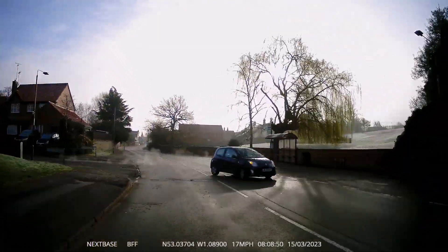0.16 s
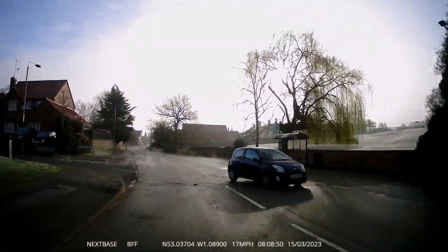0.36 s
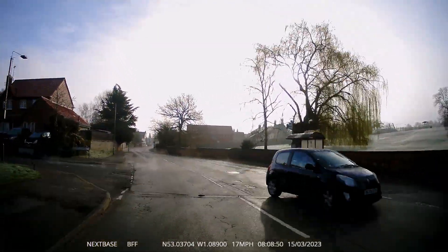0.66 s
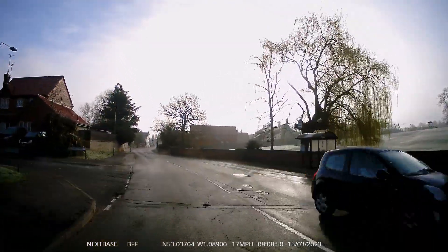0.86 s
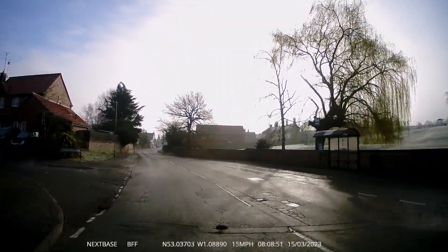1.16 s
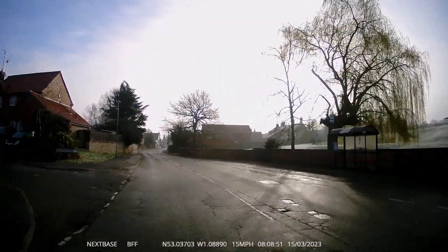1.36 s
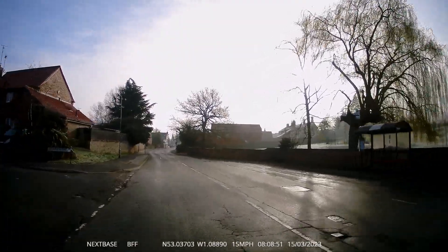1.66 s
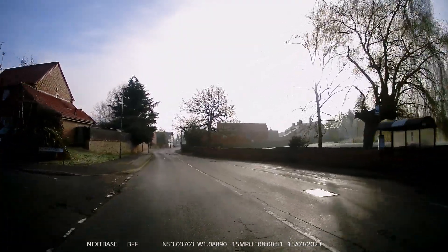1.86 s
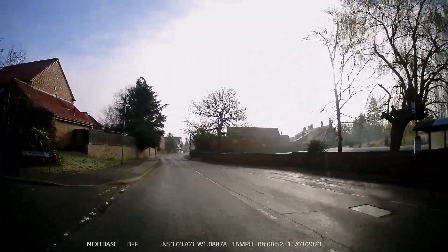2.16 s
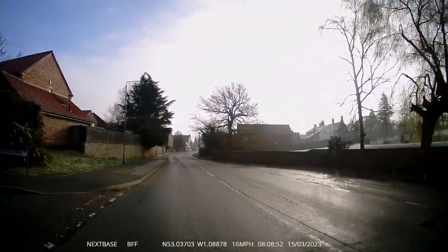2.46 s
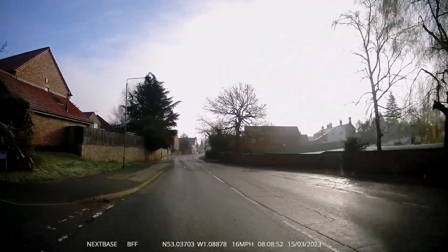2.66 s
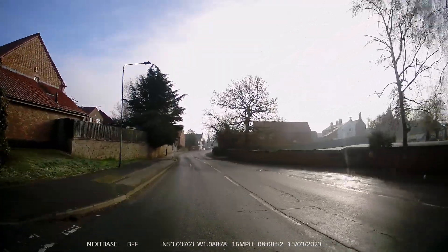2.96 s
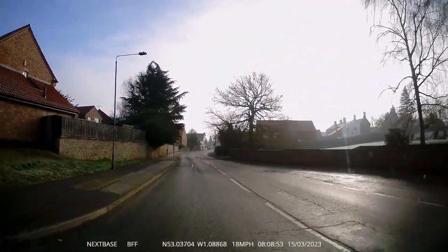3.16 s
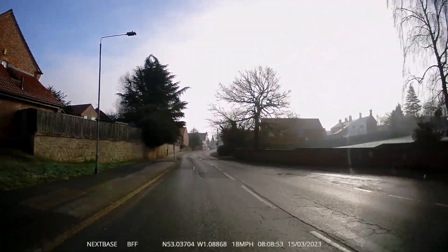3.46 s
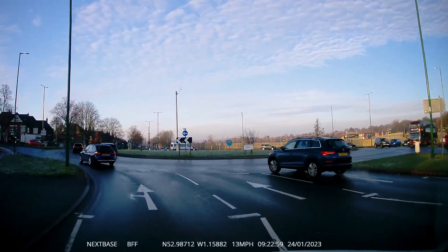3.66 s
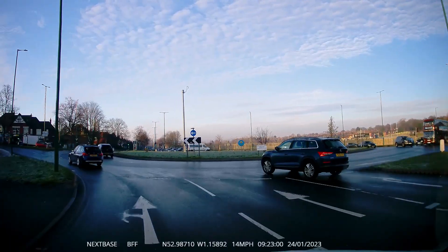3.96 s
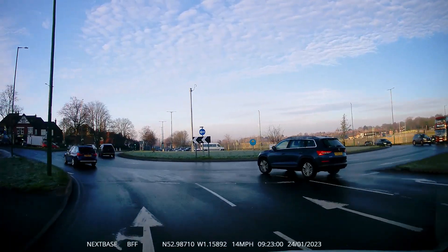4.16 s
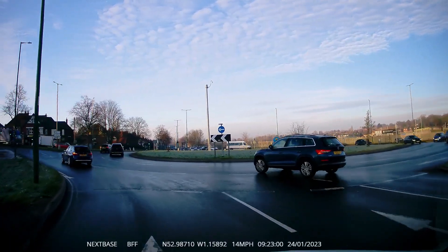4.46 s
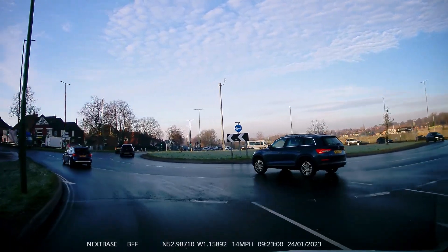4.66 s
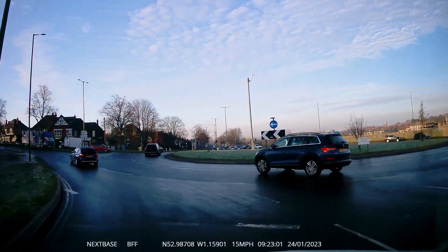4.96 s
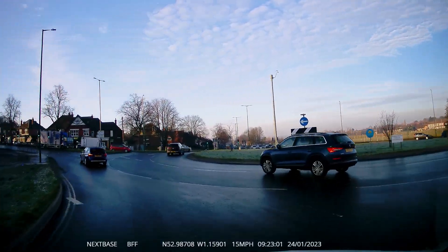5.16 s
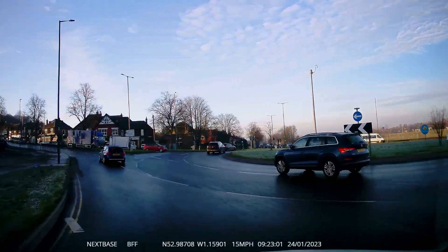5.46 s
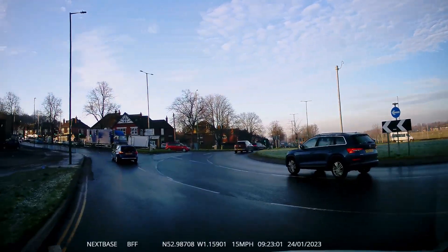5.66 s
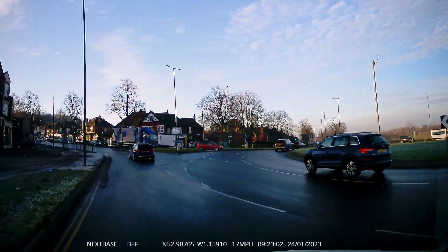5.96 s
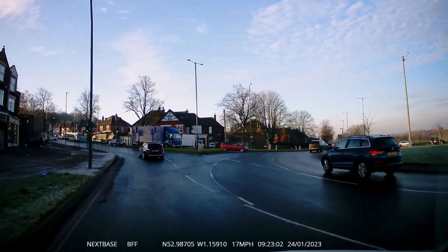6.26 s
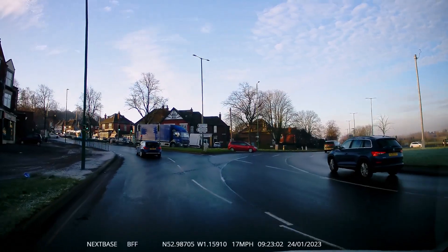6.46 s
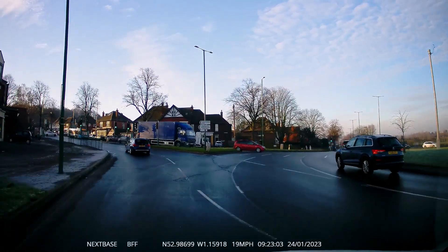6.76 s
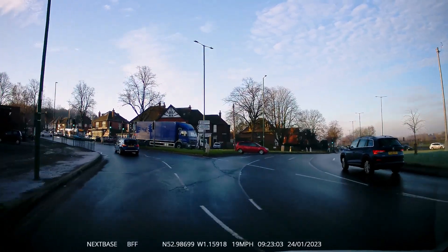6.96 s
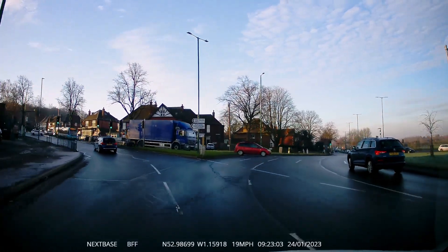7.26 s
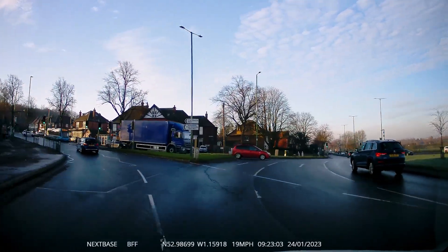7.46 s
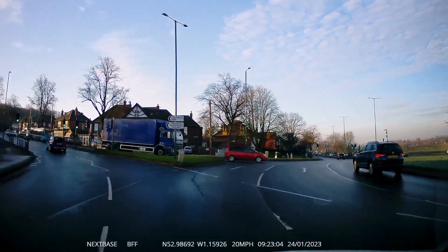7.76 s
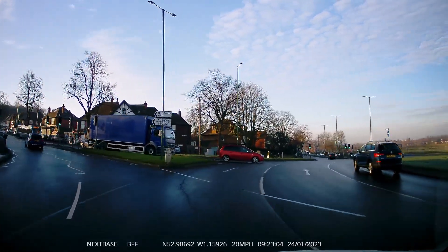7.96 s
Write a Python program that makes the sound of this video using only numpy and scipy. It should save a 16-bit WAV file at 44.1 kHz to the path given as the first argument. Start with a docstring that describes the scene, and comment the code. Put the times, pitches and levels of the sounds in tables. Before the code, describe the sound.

A microphone in the enclosed cabin picks up boomy, bass-heavy road noise. First a slow dry street: quiet tyres, low engine and a run of rattling bumps. After a split-second gap, a wet roundabout brings fuller hiss and rumble while the engine pitch rises. Loose things chatter into one sharp bang, a low hum climbs, and the engine falls to a lower note with more bumps.

```python
"""Inside a car at town speed

Shaped noise makes road rumble, roar and hiss; randomly driven resonances shake the body and boom in the cabin.
Bumps excite modes of trim and panels, loose things chatter, and a low hum climbs late on.
The engine, a firing tone with overtones lifted by cabin resonances, rises and falls through the gears.
A dry street gives way to a wet roundabout: the sound drops out for an instant and the hiss changes."""
import sys
import numpy as np
from scipy import signal
from scipy.fft import rfft, irfft
from scipy.io import wavfile
from scipy.ndimage import uniform_filter1d

SR = 44100
rng = np.random.default_rng(int(sys.argv[2]) if len(sys.argv) > 2 else 0)


def file_out(sig):
    """Save sig as 16-bit WAV at sys.argv[1]."""
    # one column per channel
    cols = np.atleast_2d(sig).T
    # limit, then scale
    lim = np.clip(cols, -1, 1)
    pcm = np.round(lim * 32767).astype(np.int16)
    wavfile.write(sys.argv[1], SR, pcm)


N = 358086  # samples
WET_START_S = 3.579  # the dry street ends, and the sound is silent for an instant


def gain_of(db):
    """Logarithmic level: decibels become an amplitude ratio."""
    return 10 ** (np.asarray(db) / 20)


def evened(x):
    """Root-mean-square level: scales a signal to unit rms."""
    return x / np.sqrt(np.mean(abs(x) ** 2) + 1e-20)


def read(points, hz):
    """Spectral envelope: interpolates levels on a log-frequency axis."""
    f, value = np.transpose(points)
    return np.interp(np.log(hz + 1), np.log(f + 1), value)


def columns(rows):
    """Control curves: interpolates the columns of a table linearly in time."""
    s, *values = np.transpose(rows)
    return [np.interp(np.arange(N) / SR, s, v, left=v[0], right=v[-1]) for v in values]


def peak(s, db, rise, fall):
    """Exponential growth and decay: a level in dB peaks at s, with slopes in dB per second."""
    t = np.arange(N) / SR - s
    return db + np.minimum(rise * t, -fall * t)


def add(mix, s, sound):
    """Superposition: adds a sound to the mix at time s."""
    part = mix[round(s * SR):][:len(sound)]
    part += sound[:len(part)]


def modes(table, hz, extra_db=0, damping=1):
    """Modal superposition: sums the complex responses of resonances; damping widens them."""
    f, width, db = (np.array(c)[:, None] for c in zip(*table))
    width = width * damping
    gains = gain_of(db + np.reshape(extra_db, (-1, 1)))
    return (gains * width / (width + 2j * (hz - f))).sum(0)


def drift(hz):
    """Slow random modulation: sums sines of random phase up to hz, at unit rms."""
    t = np.arange(N // 256 + 2) * 256 / SR
    sines = (np.sin(2 * np.pi * (f * t + rng.random())) / np.sqrt(f)
             for f in np.geomspace(hz / 20, hz, 20))
    return np.interp(np.arange(N) / SR, t, evened(sum(sines)))


def noise(spectrum, patchy_db, flicker_db, size):
    """Shaped noise: random short-time spectra with drifting patches and a flicker shared by all bands."""
    frames, hz = 4 * N // size + 5, np.fft.rfftfreq(size, 1 / SR)
    a, b, patches = rng.standard_normal((frames, len(hz), 3)).T
    patches = uniform_filter1d(patches, 8, 0)  # smooth along frequency
    patches = evened(uniform_filter1d(patches, 8, 1))  # smooth along time
    flicker = evened(uniform_filter1d(rng.standard_normal(frames), 3))
    level_db = read(spectrum, hz)[:, None] + patchy_db * patches + flicker_db * flicker
    z = (a + 1j * b) * gain_of(level_db)
    return evened(signal.istft(z, nperseg=size, noverlap=size * 3 // 4)[1][:N])


def ringing(hz, width, steadiness):
    """Randomly driven resonance: a narrow band of noise, with its level swings partly evened out."""
    r = np.exp(-np.pi * width * 1.5 / SR)  # two equal poles in cascade
    drive = [1, 1j] @ rng.standard_normal((2, N + SR // 4))
    z = evened(signal.lfilter([1], [1, -2 * r, r * r], drive)[-N:])
    z = z / (abs(z) + .4) ** np.clip(steadiness, 0, 1)
    carrier = np.exp(2j * np.pi * np.cumsum(hz * np.ones(N)) / SR)
    return evened((z * carrier).real)


# Road roughness. Each row: time in seconds, tyre rumble level in dB.
ROUGHNESS = [(0.0, -36), (0.79, -36.5), (2.26, -30.5), (2.92, -33.5), (3.56, -31.5), (5.13, -27),
             (5.52, -24.5), (5.7, -26.5), (6.83, -27), (7.76, -28.5), (8.12, -28)]
ROAD_REFERENCE_DB = -32  # rumble level on an average road


def follow_road(db, slope):
    """Level law: from db on an average road, a layer gains slope dB per dB of rumble."""
    rumble_db, = columns(ROUGHNESS)
    return db + slope * (rumble_db - ROAD_REFERENCE_DB)


# Tyre hiss spectrum. Each row: frequency in Hz, relative level in dB per Hz.
HISS_SPECTRUM = [(1760, -27.5), (3000, -6), (3500, -8), (3800, -9.5), (4600, -10.5), (6740, -10),
                 (7400, -17), (7930, -44.5), (10300, -63), (17400, -120)]


def hiss():
    """Broadband noise: tyre hiss follows one road law on dry ground and another on wet."""
    dry_ground = np.arange(N) / SR < WET_START_S
    level_db = np.where(dry_ground, follow_road(-71, 0.94), follow_road(-63.5, 0.51))
    return gain_of(level_db) * noise(HISS_SPECTRUM, patchy_db=1.8, flicker_db=1.5, size=512)


# Tyre roar spectrum. Each row: frequency in Hz, relative level in dB per Hz.
ROAR_SPECTRUM = [(350, -31), (600, -1.5), (833, -10.5), (1420, -25.5), (1540, -19.5), (1720, -14.5),
                 (2880, -21.5), (4540, -35.5), (5000, -42.5), (6500, -75), (11000, -120)]


def roar():
    """Shaped noise: the mid-band roar of the tyres rises dB for dB with roughness."""
    return gain_of(follow_road(-51.5, 1)) * noise(ROAR_SPECTRUM, patchy_db=3.0, flicker_db=0.5, size=512)


# Tyre rumble spectrum. Each row: frequency in Hz, relative level in dB per Hz.
RUMBLE_SPECTRUM = [(12, -47), (20, -24), (43, -9.5), (60, 5.5), (82, -22.5), (113, -8.5), (141, -1),
                   (178, -7.5), (206, -5.5), (409, -14.5), (498, -16.5), (677, -24), (1500, -38.5),
                   (1950, -65), (3300, -120)]


def rumble():
    """Shaped noise: low tyre rumble takes its level directly from the roughness of the road."""
    rumble_db, = columns(ROUGHNESS)
    return gain_of(rumble_db) * noise(RUMBLE_SPECTRUM, patchy_db=1.5, flicker_db=1.63, size=2048)


# Dips in the road that heave the body. Each row: peak time in seconds, peak level in dB.
BODY_HEAVES = [(.54, -37.5), (1.75, -25.5), (2.3, -17), (2.601, -28), (3.479, -32), (5.65, -21),
               (5.971, -21), (6.598, -35.5), (6.8, -19.5), (7.01, -23), (7.95, -17.5)]
HEAVE_RISE_DB_PER_S, HEAVE_FALL_DB_PER_S = 120.5, 87


def shake():
    """Sprung-mass resonance: road unevenness shakes the body, and dips heave it on its springs."""
    heave = gain_of(follow_road(-46, 0.17))
    for s, db in BODY_HEAVES:
        heave = heave + gain_of(peak(s, db, HEAVE_RISE_DB_PER_S, HEAVE_FALL_DB_PER_S))
    return heave * ringing(hz=41.84, width=10, steadiness=0.41)


# Centre of the cabin boom. Each row: time in seconds, frequency in Hz.
BOOM_PITCH = [(0, 123), (1.1, 117.8), (2.3, 121.6), (2.9, 128), (3.56, 110.3), (4.3, 111.2), (5.1, 113.6),
              (5.5, 118), (6, 127.1), (7.0, 132.3), (7.3, 122), (8.12, 108.2)]
# Swells of the boom. Each row: time in seconds, level in dB before a random drift.
BOOM_SWELLS = [(0.0, -47), (0.2, -25.5), (0.27, -41), (0.36, -27.5), (0.99, -37), (1.02, -29), (1.54, -38),
               (1.58, -26), (2.96, -36), (3.69, -26.5), (4.05, -36), (4.18, -27.5), (4.35, -31.5),
               (4.7, -26.5), (4.82, -32.5), (5.0, -25), (5.4, -34), (5.52, -22), (5.74, -34), (5.99, -21),
               (6.1, -36.5), (7.0, -27.5), (7.4, -28.5), (8.12, -27.5)]


def boom():
    """Cavity resonance: the cabin booms in swells around a moving centre frequency."""
    boom_hz, = columns(BOOM_PITCH)
    boom_db, = columns(BOOM_SWELLS)
    return gain_of(boom_db + 2.5 * drift(15)) * ringing(boom_hz, width=11.3, steadiness=0.53)


def road():
    """Superposition: sums the body, cabin and tyre sounds that the road excites."""
    return shake() + boom() + rumble() + roar() + hiss()


# Bright spectrum of chatter and ticks. Each row: frequency in Hz, relative level in dB per Hz.
TICK_SPECTRUM = [(590, -29), (1000, 0.5), (1410, -7), (1820, -4.5), (1980, -2.5), (2160, 1), (2850, -4.5),
                 (4720, -8.5), (5140, -9), (6500, -11.5), (7530, -22.5), (7930, -53.5), (10300, -76.5),
                 (17400, -120)]
# Sliding of loose things. Each row: peak time in seconds, level in dB,
# rise and fall in seconds over the range below.
SLIDES = [(2.277, -50, 0.18, 0.13), (5.505, -35, 0.42, 0.22)]
CHATTER_RANGE_DB = 20.5


def chatter():
    """Friction noise: bright, flickering noise swells and fades as loose things slide and chatter."""
    level = sum(gain_of(peak(s, db, CHATTER_RANGE_DB / rise, CHATTER_RANGE_DB / fall))
                for s, db, rise, fall in SLIDES)
    return level * noise(TICK_SPECTRUM, patchy_db=2.0, flicker_db=2.0, size=512)


SMALL_BUMP_COUNT, SMALL_T60_S = 36, 0.1
SMALL_BUMP_DB = (-17.5, -22.5, -2.5)  # greatest rattle, tick and thud, against the rumble
SMALL_SPREAD_DB = 11  # random reduction, at most
SMALL_RATTLE_HZ, SMALL_THUD_HZ, SMALL_SPREAD_OCT = 1250, 400, 0.57  # spread either way


def small_bumps():
    """Random impacts: faint bumps fall at chance moments, stronger on rough road."""
    when, rattle, thud, *size = rng.random((SMALL_BUMP_COUNT, 6)).T
    s = .05 + when * (N / SR - .1)
    road_db = np.interp(s, *np.transpose(ROUGHNESS))
    db = road_db + np.c_[list(SMALL_BUMP_DB)] - SMALL_SPREAD_DB * np.array(size)
    octaves = SMALL_SPREAD_OCT * (2 * np.array([rattle, thud]) - 1)
    pitches = np.c_[[SMALL_RATTLE_HZ, SMALL_THUD_HZ]] * 2 ** octaves
    return list(zip(s, *db, np.full(len(s), SMALL_T60_S), *pitches))


# Blows from the road. Each row: time in seconds, peak levels of rattle, treble tick and thud in dB,
# shaking t60 in seconds before clipping, rattle pitch in Hz, thud pitch in Hz.
ROAD_BUMPS = [(0.165, -35, -53.5, -28, 0.17, 1260, 327), (0.312, -43, -53, -43, 0.072, 1120, 370),
              (0.488, -31.5, -51.5, -49, 0.14, 1050, 298), (0.543, -40, -53, -56, 0.21, 1160, 490),
              (0.624, -28.5, -45.5, -26.5, 0.15, 1130, 452), (0.92, -24.5, -43.5, -24, 0.14, 1100, 365),
              (0.972, -31, -42, -30.5, 0.15, 1460, 507), (1.018, -43, -43.5, -51, 0.11, 2080, 383),
              (1.114, -24.5, -42, -34, 0.089, 1300, 444), (1.17, -33.5, -48, -37, 0.065, 1120, 293),
              (1.253, -27, -41, -28, 0.072, 1170, 535), (1.31, -65, -66, -19, 0.083, 1210, 366),
              (1.368, -26, -44.5, -24, 0.15, 1150, 477), (1.453, -33.5, -55, -40, 0.05, 1150, 400),
              (1.515, -30.5, -52, -34, 0.11, 1330, 440), (1.582, -36.5, -45, -24, 0.25, 1050, 560),
              (1.618, -30, -43, -28, 0.35, 1250, 500), (1.714, -29.5, -44, -51, 0.095, 1290, 523),
              (1.774, -26, -41.5, -27, 0.14, 1380, 440), (1.819, -32, -44, -46, 0.39, 1400, 330),
              (1.862, -25.0, -42, -17.5, 0.14, 1270, 476), (1.884, -29.5, -39, -15, 0.12, 1520, 460),
              (1.928, -32, -48, -24, 0.16, 1170, 340), (2.036, -25.5, -54, -50, 0.058, 1040, 340),
              (2.13, -24, -44, -21.5, 0.058, 1160, 420), (2.171, -29, -56.5, -22.5, 0.45, 1380, 380),
              (2.222, -23, -35, -21, 0.12, 2300, 450), (2.248, -23, -30.5, -18.5, 0.11, 2000, 480),
              (2.274, -25, -36.5, -19.5, 0.27, 1310, 490), (2.299, -28, -45.5, -27.5, 0.19, 1530, 340),
              (2.385, -29, -46, -28.5, 0.14, 1480, 500), (2.418, -36, -44, -28, 0.071, 1140, 350),
              (2.513, -30.5, -47.0, -35, 0.097, 1330, 530), (2.573, -25, -60, -29.5, 0.15, 1090, 540),
              (2.6, -25.5, -63, -23.5, 0.16, 1200, 410), (2.654, -27.5, -44, -24, 0.13, 1080, 500),
              (2.922, -36, -48, -29.5, 0.18, 1070, 580), (2.998, -45, -47, -43, 0.091, 1445, 367),
              (5.077, -58, -33.5, -21, 0.12, 2200, 310), (5.165, -53, -36.0, -46, 0.07, 2203, 290),
              (5.198, -52, -33, -54, 0.091, 2260, 320), (5.285, -49, -31.5, -30, 0.14, 2014, 438),
              (5.379, -33, -29, -34, 0.098, 2050, 420), (5.418, -30, -44, -41, 0.047, 2230, 340),
              (5.446, -15, -16, -11, 0.15, 1700, 456), (5.503, -20, -19, -39, 0.092, 2090, 400),
              (5.517, -19, -15, -8.5, 0.07, 2140, 396), (5.557, -27, -48.0, -21, 0.091, 1974, 388),
              (5.58, -50, -25.5, -42, 0.12, 2000, 350), (5.62, -37, -26, -23, 0.15, 2060, 330.4),
              (5.672, -27.5, -34, -25, 0.067, 1949, 463), (5.869, -49, -50.5, -34, 0.075, 1150, 578.5),
              (5.945, -25.5, -42, -15.5, 0.15, 1129, 439.4), (5.979, -21.5, -43, -21, 0.073, 1310, 460),
              (6.009, -24, -56, -21, 0.12, 931, 310), (6.407, -39, -56, -26, 0.084, 1386, 362),
              (6.623, -30, -36, -36, 0.1, 1327, 480), (6.69, -27, -37, -18.5, 0.088, 1221, 330),
              (6.738, -52, -46.5, -20.5, 0.094, 2140, 466), (6.81, -39, -37.5, -46, 0.053, 2250, 363),
              (6.853, -28.5, -47, -37.5, 0.08, 1010, 372), (6.962, -37.5, -53, -27.5, 0.14, 1210, 460),
              (6.996, -25.5, -48, -21, 0.11, 1063, 385), (7.012, -22.5, -42, -19, 0.082, 1120, 390),
              (7.039, -30.5, -43, -31, 0.084, 2320, 368), (7.105, -49, -48, -31.5, 0.074, 2117, 360),
              (7.431, -25, -35, -39, 0.06, 1920, 420), (7.514, -61, -34, -45, 0.086, 2109, 371.4),
              (7.759, -28.5, -49, -46, 0.033, 1503, 484.4), (7.892, -28.5, -35, -21.5, 0.088, 1210, 353),
              (7.974, -23.5, -45, -19.5, 0.12, 1070, 416.7), (8.034, -41, -37, -25, 0.06, 1560, 390),
              (8.053, -31, -41, -37, 0.043, 1640, 580)]
# Trim modes. Each row: frequency in Hz, width in Hz before damping, relative level in dB.
TRIM_MODES = [(836.5, 19, 11.5), (894, 51, 14), (988, 91, 2.5), (1140, 63, 4), (1281, 18, -4),
              (1400, 2300, -23), (1608, 79, -0.5), (1768, 32, 3.5), (1830, 34, -4), (1860, 7.3, -12.5),
              (2280, 16, -3), (2430, 46, -5), (2720, 36, -4.5)]
# Panel modes. Each row: frequency in Hz, width in Hz, relative level in dB.
PANEL_MODES = [(265, 44, 2.5), (273, 44, 7), (310, 3.9, -7), (393.7, 23, 2), (450.4, 30, -0.5),
               (512.4, 33, 2.5), (554, 25, -6), (585, 18, 2.5)]
# Small parts that ring in the tick. Each row: frequency in Hz, width in Hz, relative level in dB.
SMALL_PART_MODES = [(3080, 17, -4), (3780, 32, 4), (4550, 18, 0), (6510, 31, 5.5)]
BUMP_RISE_S, BUMP_LEAD_S = 0.0075, .0055  # the shake swells, starting just before the blow is heard
BLOW_S, BLOW_SIZE = .012, 18.6  # one clean knock near the shake's peak, against noise of about size 1
FREE_T60_S = 0.055  # after shorter shakes the trim is damped and its modes widen
RATTLE_DB_PER_OCT, THUD_DB_PER_OCT = -14, -13  # modes far from the pitch of a blow ring less
BURST, PAD = 8192, 256  # samples; the pad leaves room ahead of the burst


def bump_colours(hz, t60, rattle_hz, thud_hz, favour, tint):
    """Modal excitation: filters for rattle, tick and thud; modes near the pitch of a blow ring most."""
    trim_hz, panel_hz = np.transpose(TRIM_MODES)[0], np.transpose(PANEL_MODES)[0]
    trim_db = RATTLE_DB_PER_OCT * abs(np.log2(trim_hz / rattle_hz)) + 3.1 * favour
    panel_db = THUD_DB_PER_OCT * abs(np.log2(panel_hz / thud_hz))
    rattle = modes(TRIM_MODES, hz, trim_db, np.clip(FREE_T60_S / t60, 1, 2))
    rattle = rattle * np.minimum(hz / 750, 1) ** 3 / (1 + (hz / 3500) ** 4)
    tick = gain_of(read(TICK_SPECTRUM, hz) + 4.3 * tint) * (1 + modes(SMALL_PART_MODES, hz))
    thud = modes(PANEL_MODES, hz, panel_db)
    thud = thud * np.minimum(hz / 220, 1) ** 3 / (1 + (hz / 800) ** 4)
    return np.array([rattle, tick, thud])


def bumps():
    """Impact excitation: each bump's knock and decaying shake drive the modes of trim and panels."""
    out, t, hz = np.zeros(N), np.arange(BURST) / SR, np.fft.rfftfreq(BURST, 1 / SR)
    rows = list(ROAD_BUMPS) + small_bumps()
    favours = rng.standard_normal((len(rows), len(TRIM_MODES)))
    bursts = rng.standard_normal((len(rows), 3, BURST))
    # loose parts knock several times within one shake
    lumps = evened(uniform_filter1d(rng.standard_normal((len(rows), 1, BURST)), size=130))
    bursts = bursts * gain_of(0.96 * lumps)
    bursts[:, ::2, round(BLOW_S * SR)] += BLOW_SIZE  # in rattle and thud only
    # each tick has its own colour
    tints = evened(uniform_filter1d(rng.standard_normal((len(rows), len(hz))), size=24))
    for row, favour, tint, burst in zip(rows, favours, tints, bursts):
        s, rattle_db, tick_db, thud_db, t60, rattle_hz, thud_hz = row
        t60 = np.clip(t60, .015, .3)
        shape = (1 - np.exp(-t / BUMP_RISE_S)) ** 2 * gain_of(-60 * t / t60)
        colours = bump_colours(hz, t60, rattle_hz, thud_hz, favour, tint)
        parts = irfft(rfft(np.roll(burst * shape, PAD, 1)) * colours)
        gains = gain_of([rattle_db, tick_db, thud_db]) / abs(parts).max(1)
        add(out, s - BUMP_LEAD_S - PAD / SR, gains @ parts)
    return out


HUM_START_S, HUM_START_HZ, HUM_CLIMB_HZ_PER_S = 5.7, 94.9, 8.3


def hum():
    """Narrow-band noise: a slightly unsteady tone fades in, climbs in pitch and slowly weakens."""
    t = np.arange(N) / SR - HUM_START_S
    level_db = peak(s=6.83, db=-23.5, rise=10, fall=3)
    fade_in = np.clip(t / 0.24, 0, 1)
    tone = ringing(HUM_START_HZ + HUM_CLIMB_HZ_PER_S * t, width=5.8, steadiness=0.81)
    return gain_of(level_db) * fade_in * tone


# Engine course. Each row: time in seconds, firing rate in Hz, firing tone level in dB,
# gain of all overtones in dB.
ENGINE_COURSE = [(0, 42.2, -38, -57.5), (.4, 41.7, -38.5, -56), (1.45, 35.31, -36, -46.5),
                 (2.05, 38.93, -23, -51), (2.55, 42.02, -25, -59.5), (3.05, 44.82, -37, -39.5),
                 (3.56, 48, -25, -52), (3.6, 54.76, -32.5, -46.5), (4.1, 57.66, -32, -45),
                 (4.5, 60.26, -29.5, -44), (4.9, 63.97, -32.5, -45.5), (5.3, 66.95, -32, -41),
                 (5.7, 70.1, -42, -42), (6.1, 72.92, -33, -36.5), (6.5, 76.9, -26.5, -33.5),
                 (6.62, 75.05, -43.5, -51.5), (6.85, 62.8, -34.5, -37.5), (7.2, 48.1, -25.5, -39.5),
                 (7.6, 49.2, -27.5, -38), (7.9, 50.03, -30, -42.5)]
# Overtones. Each row: multiple of the firing rate, relative level in dB before the cabin's lift.
FIRING_OVERTONES = [(2, 7.5), (3, 2), (3.5, 0), (4, -4), (4.5, -3), (5, -1), (6, -1), (7, -2), (8, -13),
                    (11, -12)]
# Cabin resonances. Each row: frequency in Hz, width in Hz, level in dB, both before the power 1.2.
CABIN_MODES = [(94, 21, -4), (156, 81, -12), (178, 32, 0), (306.7, 9.7, -3), (363, 42.6, 1.5),
               (399.2, 21, 3), (465.7, 6.6, 0.5)]


def engine():
    """Harmonic synthesis with resonance: overtones of the firing tone swell as they cross cabin modes."""
    hz, tone_db, over_db = columns(ENGINE_COURSE)
    turns = 2 * np.pi * np.cumsum(hz * (1 + 0.002 * drift(6))) / SR
    over = np.zeros(N)
    for k, db in FIRING_OVERTONES:
        response = abs(modes(CABIN_MODES, k * hz[::256])) ** 1.2
        lift = np.interp(np.arange(N), np.arange(0, N, 256), response)
        # uneven firings roughen each overtone
        wobble = 2 * np.pi * rng.random() + .15 * drift(12)
        over += lift * gain_of(db + 1.5 * drift(6)) * np.sin(k * turns + wobble)
    tone = gain_of(tone_db + 1.1 * drift(9)) * np.sin(turns)
    return np.sqrt(2) * (tone + gain_of(over_db) * over)  # levels are rms


def scene():
    """Superposition: all sources add at one point."""
    return (road() + chatter() + bumps() + hum() + engine())[None]


FADE_OUT_S, FADE_IN_S = 0.04, 0.025
EDGE_HZ = 8080  # upper band limit


def record(dry):
    """Gating and low-pass filtering: a brief fade out and in, then the band limit."""
    times = [WET_START_S - FADE_OUT_S, WET_START_S, WET_START_S + FADE_IN_S]
    fade = np.interp(np.arange(N) / SR, times, [1, 0, 1]) ** 1.7
    low_pass = signal.firwin(1023, EDGE_HZ, window=("kaiser", 9), fs=SR)
    return signal.oaconvolve(dry * fade, low_pass[None], "same")


dry = scene()
out = record(dry)
file_out(out)
```